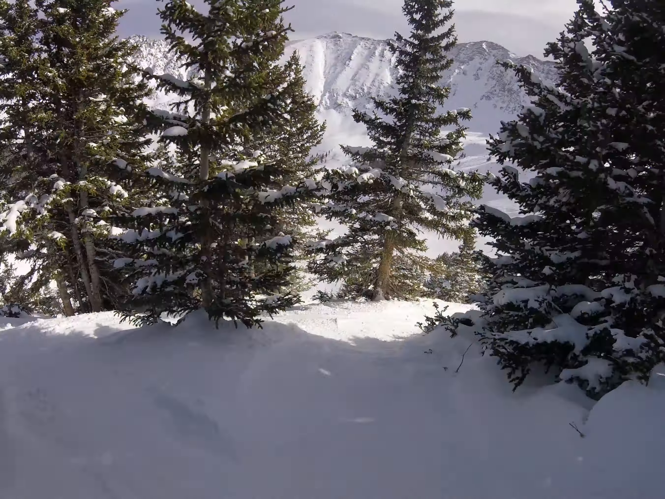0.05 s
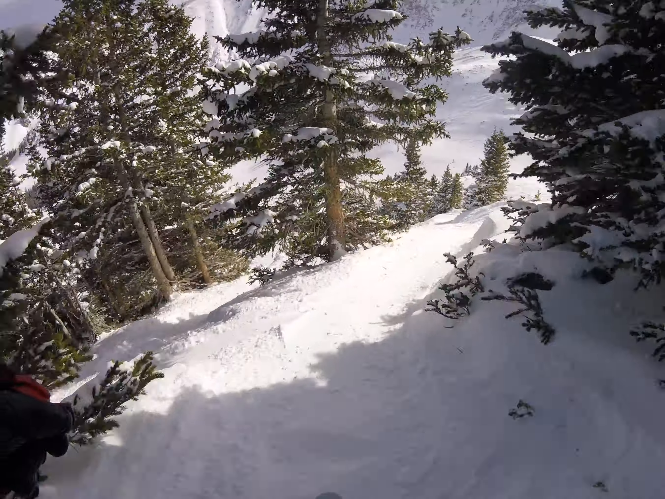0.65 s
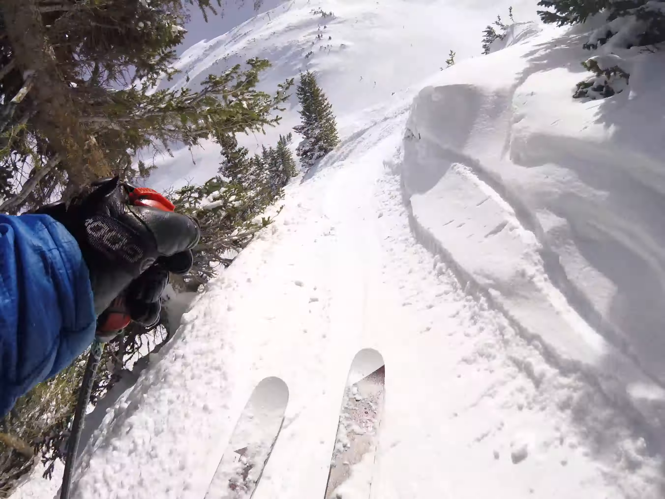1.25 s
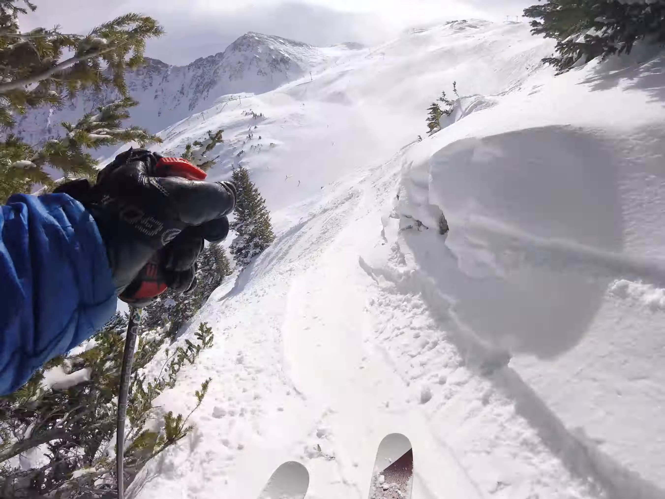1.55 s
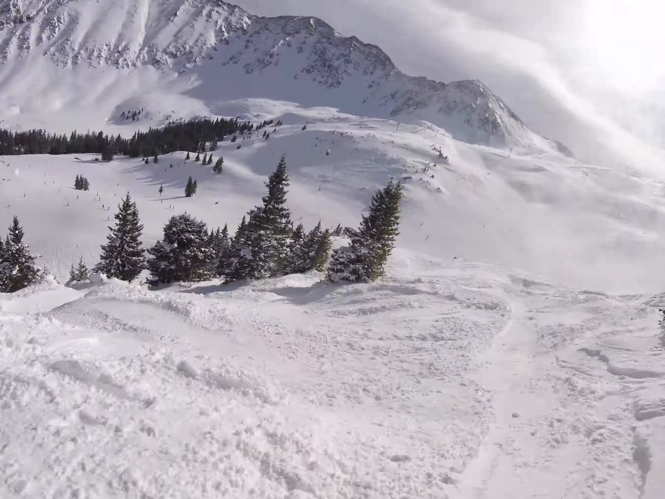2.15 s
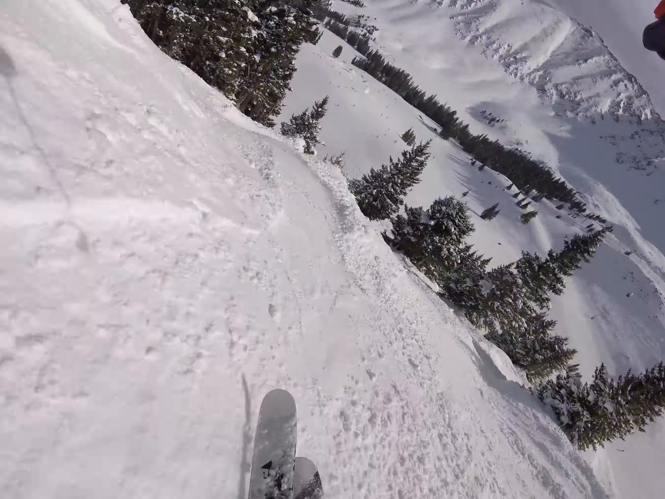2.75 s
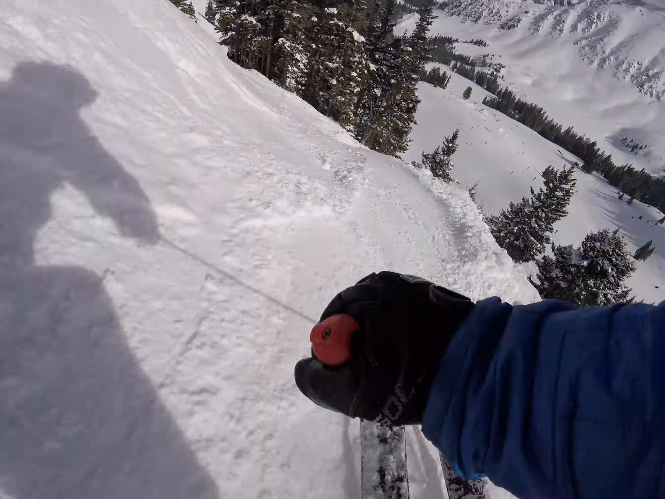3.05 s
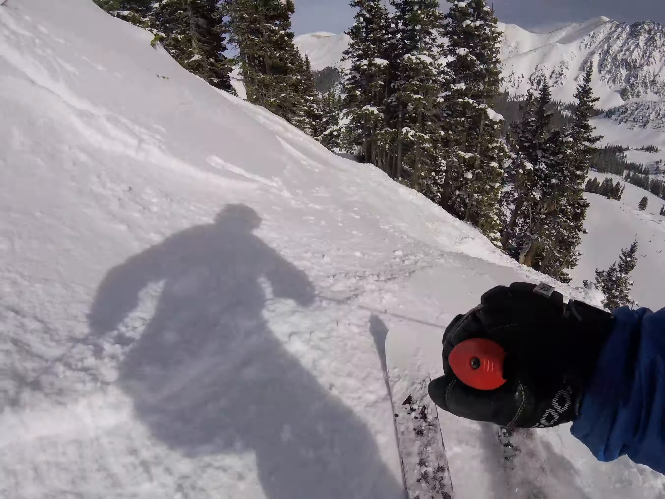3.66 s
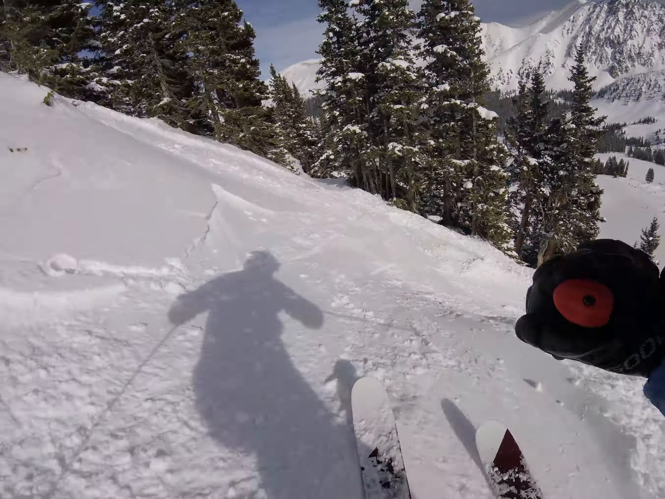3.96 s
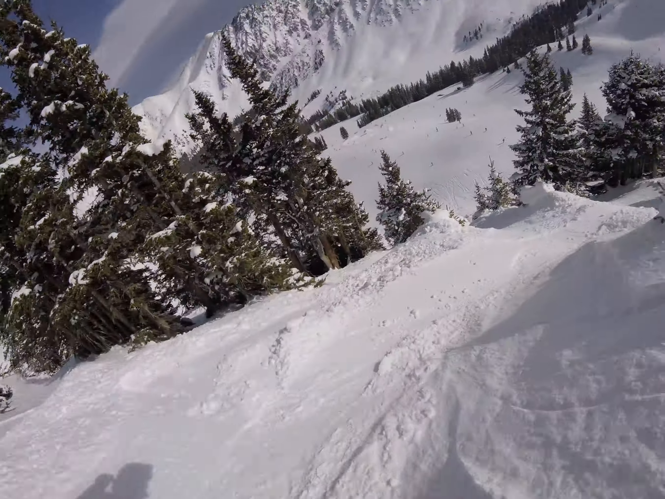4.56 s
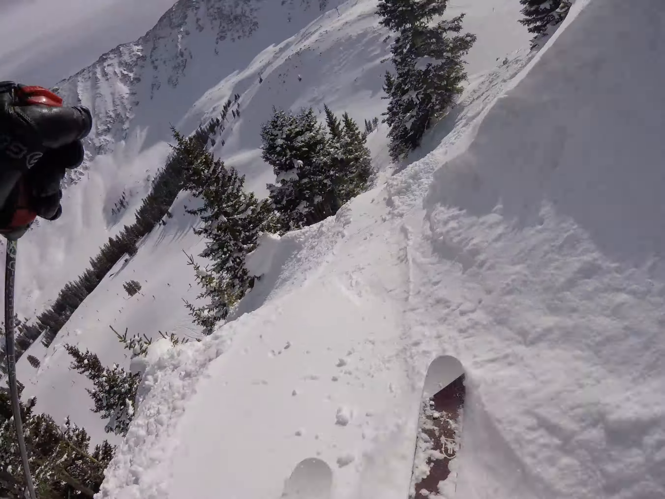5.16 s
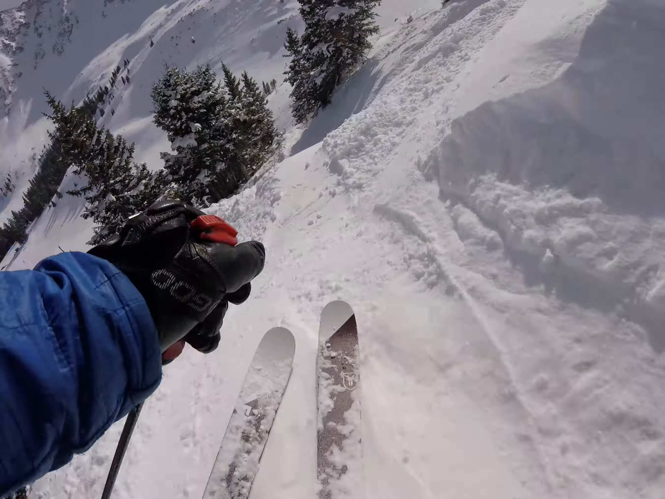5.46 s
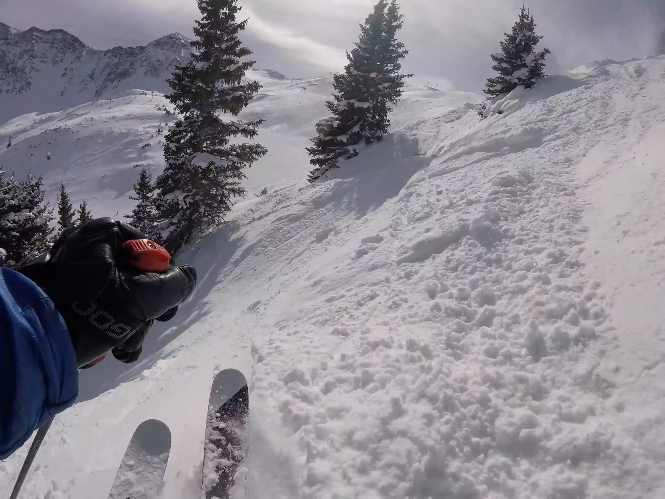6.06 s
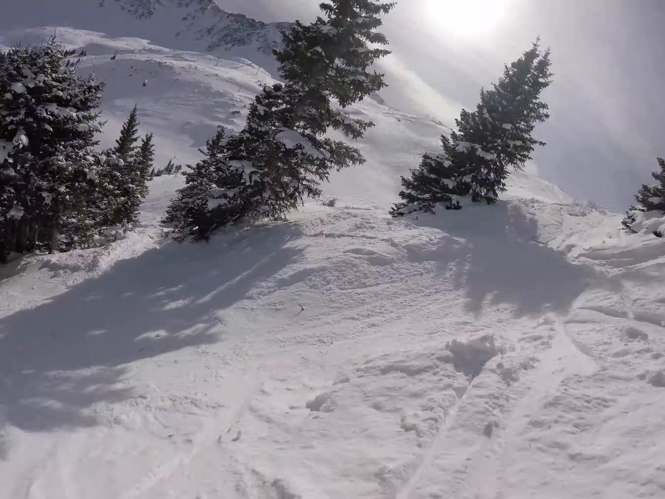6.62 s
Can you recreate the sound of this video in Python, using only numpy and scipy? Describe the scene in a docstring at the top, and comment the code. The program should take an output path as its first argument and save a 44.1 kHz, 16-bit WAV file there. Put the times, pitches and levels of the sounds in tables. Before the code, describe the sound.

Gusty wind rumbles on a body-worn microphone as skis crunch through turns, spray powder and knock over lumps, with brief gear clicks.

```python
"""Powder run through the trees, camera on the body.

Heard from a body's height above the skis: the edges scrape and crunch through each turn and throw
hissing spray, the skis knock over lumps, and a buckle and a pole clack close by. Wind rumbles right on
the microphone and tears at it in gusts; a limiter holds the peaks."""
import sys
import numpy as np
from scipy import signal
from scipy.fft import rfft, irfft
from scipy.io import wavfile
from scipy.ndimage import uniform_filter1d, minimum_filter1d

SR = 44100
rng = np.random.default_rng(int(sys.argv[2]) if len(sys.argv) > 2 else 0)


def master_out(mix):
    """Clip the mix to full scale and print it as 16-bit PCM to the path in sys.argv[1]."""
    frames = np.transpose(np.atleast_2d(mix))
    ceiling = np.clip(frames, -1, 1)
    pcm = np.round(ceiling * 32767).astype(np.int16)
    wavfile.write(sys.argv[1], SR, pcm)


N = 299439
TIME = np.arange(N) / SR

# Snow spray with a clear path to the microphone. Each row, as in every colour: frequency in Hz, gain in dB.
OPEN_SPRAY_COLOUR = [(1200, -3.5), (2600, -4), (3500, -3), (4300, -7.5), (4800, 0), (5300, 3), (5900, -4.5),
                     (6450, -2), (7500, -7.5), (10200, -11), (11000, -18.5), (11700, -27.5), (14000, -27.5),
                     (15200, -46)]
# Eddies shed in step as the air slows. Each row: time in seconds, rate in Hz, relative level in dB.
SHED_EDDIES = [(3.56, 340, -52), (3.63, 294.8, -31.5), (3.72, 188, -28), (3.8, 156.1, -26.5),
               (3.85, 116.4, -22), (3.958, 100, -22), (3.98, 95.13, -51)]


def skis(hard_bite_db=-24, rasp_growth=3.3):
    """Edges crush the snow in small fractures and throw fine spray; both shake as the skis chatter."""
    # The skier's lean. Each row: time in seconds, share of the spray shaded by the body from 0 to 1.
    leaning = [(0, 0.25), (3.25, 0.02), (3.5, 0.83), (4.8, 1), (5.35, 0.84), (5.75, 0.4), (6.4, 0.3),
               (6.79, 0.4)]
    # Crushed snow, firm snow, and spray heard past the body. Each row: frequency in Hz, gain in dB.
    scrape_colour = [(120, 5.5), (350, 10.5), (700, 4.5), (1150, 4), (1500, -0.5), (2100, -6.5),
                     (3000, -14), (4200, -21.5), (6000, -21.5), (12000, -73)]
    rasp_colour = [(450, -14), (800, 16.5), (1150, -18), (1500, -20.5), (2100, 3), (3050, 1.5), (3600, -5),
                   (4400, -14.5), (8000, -39.5)]
    shaded_colour = [(1200, 3.5), (2900, 1), (3700, -11), (4400, -16), (5400, -2), (7100, -1.5),
                     (8000, -9.5), (9300, -16), (11300, -27.5), (12500, -23.5), (15000, -36)]
    chatter = waver(25.6)
    edge_db, powder_db = ski_load()
    fractures = grains(650, 3.4)
    crushed = (rng.standard_normal(N) + fractures) * gain_of(0.5 * chatter)
    scrape = coloured(crushed, scrape_colour) * gain_of(edge_db + 2)
    # an edge that bites hard reaches firm snow and rasps
    rasp_db = hard_bite_db - 4 + rasp_growth * (edge_db - hard_bite_db)
    rasp = coloured(grains(2500, 2.0), rasp_colour) * gain_of(rasp_db)
    crystals = rng.standard_normal(N) + 0.42 * grains(2500, 3.9)
    shade = np.clip(follow(leaning), 0, 1)
    spray = (1 - shade) * coloured(crystals, OPEN_SPRAY_COLOUR) + shade * coloured(crystals, shaded_colour)
    spray = evened(spray * gain_of(chatter)) * gain_of(powder_db + 1)
    return patchy(scrape + (1 - shade) * rasp, depth_db=3) + patchy(spray, depth_db=2)


def ski_load(glide_scrape_db=-55, glide_spray_db=-62, swish_rise_s=0.013, swish_release_s=0.054):
    """Relative levels in dB of edge scrape and powder spray: flat gliding, plus turns, plus swishes."""
    # The skis load up, carve and let go. Each row: time of full load, rise, hold and release in seconds
    # (rise and release per 10 dB, sign ignored), relative scrape and spray in dB.
    turns = [(.18, -1.5, 0.0316, 0.2, -40, -44), (1.3, 1, 0.43, 0.18, -39.5, -42.5),
             (2.75, 0.3453, 0.363, 0.1164, -26.5, -35.5), (3.22, -0.5, 0.0099, 0.1561, -27.5, -36.5),
             (4.97, .5, 0.2904, 0.32, -42.5, -44), (6.02, 0.28, 0.05, 0.1, -37.5, -45),
             (6.45, -0.1, 0.12, -3.5, -39, -43)]
    # An edge catches briefly. Each row: time and hold in seconds, relative scrape and spray in dB.
    catches = [(.07, 0.0133, -37.5, -64), (0.268, .01, -40, -40.5), (0.363, 0.0098, -61, -39.5),
               (0.685, .02, -45, -63), (1.762, 0.081, -33.5, -60), (1.948, 0.007, -41, -43),
               (2.413, 0.039, -31, -46.5), (2.555, 0.022, -26, -37.5), (2.736, 0.024, -27.5, -30.5),
               (2.958, 0.075, -26.5, -32.5), (3.112, 0.0064, -28.5, -43.5), (3.319, 0.0374, -28, -54),
               (3.482, 0.017, -34, -49), (3.7, 0.091, -53.5, -60), (4.045, 0.075, -43.5, -68),
               (4.154, 0.048, -38, -52), (4.247, 0.032, -36.5, -54.5), (4.559, 0.016, -35, -63),
               (4.655, 0.0202, -34.5, -43), (4.886, 0.0326, -29, -31.5), (4.931, 0.0412, -27, -39),
               (5.771, 0.0184, -43.5, -44), (6.39, 0.0156, -54, -51), (6.447, .015, -36, -42),
               (6.582, 0.019, -30, -45)]
    swishes = [(s, swish_rise_s, hold_s, swish_release_s, *levels) for s, hold_s, *levels in catches]
    scrape_power, spray_power = gain_of(glide_scrape_db) ** 2, gain_of(glide_spray_db) ** 2
    for s, rise_s, hold_s, release_s, scrape_db, spray_db in list(turns) + swishes:
        before, after = np.maximum(s - TIME, 0), np.maximum(TIME - s - hold_s, 0)
        load = 10 ** -np.minimum(before / abs(rise_s) + after / abs(release_s), 10)
        scrape_power += load * gain_of(scrape_db) ** 2
        spray_power += load * gain_of(spray_db) ** 2
    return 10 * np.log10(scrape_power), 10 * np.log10(spray_power)


def knocks(rise_s=0.0018):
    """A ski hits a lump: a dull crack and a spit of snow."""
    # Each row: start in seconds, relative level in dB, relative treble in dB, size of the sharp blow
    # within the crunch, pitch factor (low for soft lumps).
    lumps = [(0.0645, -14, -13, 0.47, .95), (.079, -23, -27.5, .2, 0.77), (0.103, -24, -28.5, .8, 0.98),
             (1.768, -18, -20, 0.36, 0.85), (2.771, -17.5, -20, .3, 1.3), (2.7985, -8.5, -10, 1.66, 1.2),
             (2.8504, -15, -13, 0.92, 1.25), (2.911, -21, -15, .7, 0.68), (3.109, -18, -20, .2, 0.72),
             (4.1518, -23.5, -25, 0.59, 0.8), (4.999, -21.5, -14, .2, 1.52), (5.0125, -20, -26, .2, 1.45),
             (5.0228, -22, -17, .2, 1.46), (5.616, -23.5, -32, .2, 0.795), (5.858, -20.5, -20.5, .1, 0.86),
             (5.968, -19, -38, .1, 0.51), (6.093, -15, -34, .1, 0.87), (6.101, -19, -34, .1, 0.773)]
    # The crack at pitch factor 1. Each row: frequency in Hz, gain in dB.
    crack_colour = [(150, -8), (500, 13), (800, 19), (1300, 11.5), (2000, 8.5), (3000, -8), (4500, -19),
                    (9000, -69)]
    out = np.zeros(N)
    for s, db, treble_db, blow, pitch in lumps:
        crack = scuff(transposed(crack_colour, pitch), rise_s, blow)
        spit = gain_of(treble_db - 2) * scuff(OPEN_SPRAY_COLOUR, rise_s)
        add(out, s, gain_of(db + 9) * (crack + spit))
    return out


def wind(strong_db=-20, tear_growth=1.29, orderly_db=-7):
    """Big eddies rumble, smaller ones in the body's wake drum and buffet; the strongest tear raggedly."""
    # Slow pressure swings, the body's wake, and the air's force on the camera, which builds in each turn.
    # Each row: time in seconds, relative level in dB.
    swings = [(0, -23), (.37, -17), (.62, -29.5), (1.05, -21.5), (1.2, -22.5), (1.62, -15), (1.8, -24.5),
              (2.34, -24), (2.42, -14.5), (2.72, -19.5), (3.07, -13.5), (3.42, -28), (3.5, -16),
              (3.62, -18.5), (3.72, -34), (4.15, -35), (4.53, -40.5), (4.66, -28.5), (4.95, -28.5),
              (5.35, -34), (5.65, -20.5), (6.03, -15), (6.44, -23), (6.57, -33.5), (6.72, -25.5)]
    drumming = [(0, -39), (.08, -20), (.36, -25.5), (.5, -43), (1.07, -20), (1.3, -30), (1.42, -15.5),
                (1.68, -25.5), (1.76, -27), (2.25, -33), (2.8, -27.5), (3.1, -16), (3.38, -33.5),
                (3.55, -18.5), (3.94, -19.5), (4.02, -24.5), (4.48, -40.5), (4.7, -28), (5.15, -25),
                (5.27, -30.5), (5.6, -17.5), (6.15, -14.5), (6.4, -24), (6.6, -32.5), (6.76, -38)]
    airflow = [(0, -44), (.09, -23), (.57, -39), (1.06, -23), (1.6, -23), (2.33, -45.5), (2.42, -21),
               (2.6, -26), (2.72, -21), (3.27, -18), (3.38, -47), (3.53, -17.5), (3.68, -35), (4.45, -41.5),
               (4.66, -29.5), (4.98, -25.5), (5.42, -35), (5.76, -20), (6.14, -16), (6.28, -36),
               (6.55, -26), (6.79, -43.5)]
    # Their colours at the microphone. Each row: frequency in Hz, gain in dB.
    rumble_colour = [(5, -5), (20, -1), (45, -3.5), (70, -10.5), (130, -41), (400, -92)]
    wake_colour = [(30, -16.5), (62, 0.5), (100, 1.5), (140, -7), (200, -15.5), (300, -28.5), (800, -80)]
    buffet_colour = [(70, -19), (140, -3.5), (190, 1), (270, -3.5), (380, -8.5), (520, -19.5), (900, -28.5),
                     (2000, -74)]
    force_db = follow(airflow) + 2.28 * waver(2.4)
    rumble = steadied(noise(rumble_colour), 0.0334) * gain_of(follow(swings) + 3 + waver(9.9))
    wake = steadied(noise(wake_colour), 0.065) * gain_of(follow(drumming) + 0.5 + 2.5 * waver(6.7))
    lumpy_air = noise(buffet_colour) * gain_of(3.5 * waver(45))
    buffet = steadied(lumpy_air, 0.0321) * gain_of(force_db - 3)
    tear = tearing() * gain_of(strong_db - 13 + tear_growth * (force_db - strong_db))
    # while eddies are shed in step, the flow is less turbulent
    orderly = uniform_filter1d(between(SHED_EDDIES[1][0], SHED_EDDIES[-1][0]), size=2000)
    return rumble + (wake + buffet + tear) * gain_of(orderly_db * orderly)


def tearing(low_hz=280, high_hz=860, db_per_octave=-7):
    """A hail of eddies in five sizes, the smaller ones higher and weaker."""
    hail = np.zeros(N)
    for hz in np.geomspace(low_hz, high_hz, num=5):
        eddies = signal.oaconvolve(grains(110, 4.0), eddy(hz), "same")
        hail += gain_of(db_per_octave * np.log2(hz / low_hz)) * evened(eddies)
    return steadied(hail, 0.075)


def eddy(hz):
    """The pressure swing of one eddy passing the microphone, of peak 1, centred in 20 ms."""
    phase = 2 * np.pi * hz * (TIME[:SR // 50] - 0.01)
    swing = phase / (1 + phase ** 2 / 14) ** 8
    return swing / abs(swing).max()


def gusts(low_hz=90, top_hz=6000, steepness=3.11, fft_size=8192):
    """Short, ragged bursts of turbulence hit the microphone and stop abruptly."""
    # Each row: start and length in seconds, level in dB, upper edge in Hz.
    bursts = [(0.06, 0.0233, -13, 274), (.668, .04, -23.5, 110), (.775, 0.052, -21.5, 200),
              (1.519, 0.0215, -18.5, 199), (1.579, 0.027, -19, 200), (1.66, 0.044, -16, 200),
              (2.402, 0.042, -23.5, 500), (3.05, 0.068, -17, 794), (3.114, 0.0204, -12, 470),
              (3.239, 0.032, -16, 974), (3.253, 0.032, -13, 128), (3.273, 0.0145, -15, 770),
              (3.435, 0.022, -18, 430), (3.48, 0.046, -20, 402), (4.052, 0.027, -21.5, 115),
              (4.159, 0.027, -17.5, 89), (4.558, 0.048, -25, 572), (4.745, 0.073, -26.5, 118),
              (5.132, 0.069, -24.5, 208), (5.473, 0.0577, -15, 192.4), (5.601, 0.026, -19.5, 502),
              (5.721, 0.027, -16, 234), (5.826, 0.056, -15, 280), (6.068, 0.056, -16, 300),
              (6.25, 0.0492, -21.5, 190), (6.417, 0.026, -18.5, 126)]
    out = np.zeros(N)
    hz = np.fft.rfftfreq(fft_size, 1 / SR)
    flutter = gain_of(2 * waver(75))
    band = hz ** 2 / (hz ** 2 + low_hz ** 2) / np.sqrt(hz + low_hz) * np.exp(-(hz / top_hz) ** 2)
    for s, length_s, db, edge_hz in bursts:
        shape = band / np.sqrt(1 + (hz / edge_hz) ** (2 * steepness - 1))
        n = int(length_s * SR)
        burst = irfft(rfft(rng.standard_normal(fft_size)) * shape)[:n]
        envelope = flutter[int(s * SR):][:n] * signal.windows.tukey(n, .3)
        add(out, s, gain_of(db) * evened(burst * envelope))
    return out


def pops(pitch_factor=0.59, centre_delay_s=0.00276):
    """The largest eddies land on the microphone as separate dull pops and break up with a crackle."""
    # Each row: start in seconds, relative peak in dB, Hz before the pitch factor, relative crackle in dB.
    large_eddies = [(0.0639, -1, 540, -0.5), (0.684, -15, 305, -23), (0.793, -10.5, 294, -16.5),
                    (1.056, -7, 298, -26), (2.91, -10.5, 425, -2.5), (3.244, -8, 302, -5),
                    (3.293, -1, 480, 4), (3.325, -15, 500, -8.5), (3.446, -23, 800, -18),
                    (3.48, -12, 500, -23), (3.546, -9, 546, -3.5), (3.574, -23, 600, -9.5),
                    (3.603, -18, 356, -21), (3.635, -15, 280, -31), (5.638, -17, 400, -10.5),
                    (5.724, -14, 338, -13.5), (5.781, -10.5, 400, -12), (5.813, -11, 360, -8.5),
                    (5.836, -12, 340, -8), (5.858, -4, 394, -12), (5.894, -10.5, 400, -11),
                    (5.905, -12, 450, -6), (5.926, -11, 570, -6), (5.965, -11.5, 567, -8),
                    (5.977, -16, 450, -12.5), (5.995, -17, 400, -12), (6.026, -8.5, 300, -25.5),
                    (6.07, -13, 420, -9), (6.092, -6.5, 500, -14), (6.117, -6, 340, -9),
                    (6.141, -15, 400, -5.5), (6.286, -11.5, 400, -15), (6.322, -13, 363, -25)]
    # An eddy breaking up. Each row: frequency in Hz, gain in dB.
    crackle_colour = [(150, 2.5), (350, -0.5), (550, 3), (850, 2.5), (1250, -12), (2000, -22.5),
                      (3200, -38), (8000, -63)]
    out = np.zeros(N)
    for s, db, hz, crackle_db in large_eddies:
        swing = eddy(hz * pitch_factor)
        add(out, s + centre_delay_s - len(swing) / 2 / SR, gain_of(db - 1.5) * swing)
        add(out, s, gain_of(crackle_db - 1) * scuff(crackle_colour, rise_s=0.0024))
    return out


def shedding(wander=0.11):
    """Eddies shed in step make a hollow, unsteady moan that sinks as the air stream slows."""
    hz = follow(SHED_EDDIES) * (1 + wander * waver(49))
    moan = np.sin(2 * np.pi * np.cumsum(hz) / SR) * gain_of(3.9 * waver(30))
    sounding = between(SHED_EDDIES[0][0], SHED_EDDIES[-1][0])
    return evened(moan) * gain_of(follow(SHED_EDDIES, column=2) - 1) * sounding


def clacks():
    """A buckle near the microphone clicks with a tight metallic ping."""
    # Each row: time in seconds, relative level in dB.
    hits = [(.066, -27), (1.7567, -22), (1.7694, -11.5)]
    # The click of contact. Each row: frequency in Hz, gain in dB.
    click_colour = [(300, -5), (1200, -8), (2800, -7), (4000, -20), (5100, 23.5), (6400, 14), (8000, 10),
                    (10000, 2), (11700, -24), (15000, -22)]
    # Each row: frequency in Hz, relative level in dB, seconds to fall by 60 dB.
    buckle_modes = [(4600, -5, .008), (5300, -1.5, .011), (6350, -11, .011)]
    out = np.zeros(N)
    for s, db in hits:
        add(out, s - .001, gain_of(db - 5.5) * scuff(click_colour, rise_s=0.00081))
        add(out, s, gain_of(db - 1) * ringing(buckle_modes))
    return out


def rattle():
    """A pole chatters against the gear in a few quick contacts and rings briefly."""
    # Each row: start in seconds, relative levels of contact and ring in dB.
    contacts = [(6.228, -21, -40), (6.235, -27, -35.5), (6.238, -18, -25.5), (6.243, -24, -36)]
    # Pole on gear. Each row: frequency in Hz, gain in dB.
    contact_colour = [(400, 4), (1300, 7.5), (2300, 9.5), (3800, -8), (5100, 9.5), (6800, -9), (9500, 4),
                      (11000, -5.5), (12000, -20), (14000, -15), (15500, -35)]
    # Each row: frequency in Hz, relative level in dB, seconds to fall by 60 dB.
    pole_modes = [(802, -11, .07), (1152, 4, 0.11), (1518, -1, 0.05), (1674, -3, .041), (2385, -7, 0.035),
                  (3316, -14, .035)]
    out = np.zeros(N)
    for s, db, ring_db in contacts:
        add(out, s, gain_of(db) * scuff(contact_colour, rise_s=0.0014))
        add(out, s, gain_of(ring_db) * ringing(pole_modes))
    return out


def ticks(rise_s=0.002):
    """Bits of ice strike the skis, each at its own pitch."""
    # Each row: start in seconds, relative level in dB, pitch in Hz, spit of snow in dB against the tick.
    ice_bits = [(.541, -26, 2180, -12), (1.1319, -24, 2400, -3.5), (1.1995, -16.5, 2650, -5),
                (1.8, -23, 1850, -20), (1.967, -20.5, 2720, 0), (4.179, -29, 2600, -3),
                (4.336, -30.5, 2870, -19)]
    # One tick. Each row: multiple of its pitch, gain in dB.
    tick_colour = [(.2, -18), (.55, -4), (.85, 1), (1, 2), (1.25, -4), (1.9, -9), (4.5, -34)]
    out = np.zeros(N)
    for s, db, hz, spit_db in ice_bits:
        tick = scuff(transposed(tick_colour, hz), rise_s)
        spit = gain_of(spit_db) * scuff(OPEN_SPRAY_COLOUR, rise_s)
        add(out, s, gain_of(db - 1.5) * (tick + spit))
    return out


def flurries():
    """Flung powder sprinkles the camera in short, narrow hisses, each at its own pitch."""
    # Each row: thickest moment and length in seconds, level in dB, centre in Hz.
    handfuls = [(2.333, 0.0083, -46, 5800), (2.57, .03, -33, 6740), (2.756, 0.11, -29, 5880),
                (4.249, 0.035, -46, 6560), (4.654, .036, -39, 6420), (4.913, 0.0276, -31.5, 6300)]
    # One hiss. Each row: multiple of its centre frequency, gain in dB.
    hiss_colour = [(.5, -30), (.78, -9.5), (.92, -1), (1, -0.5), (1.1, -3.5), (1.3, -17), (1.65, -26.5),
                   (2, -45)]
    out = np.zeros(N)
    for s, length_s, db, hz in handfuls:
        hiss = noise(transposed(hiss_colour, hz), SR // 5)[:int(length_s * SR)]
        add(out, s - length_s / 2, gain_of(db) * hiss * signal.windows.hann(len(hiss)))
    return out


def singing():
    """Friction stirs a broad resonance of the gliding skis, and they sing hollowly."""
    # One list a spell of singing. Each row: time in seconds, level in dB.
    spells = [
        [(2.08, -59), (2.16, -42.5), (2.22, -69), (2.3, -47), (2.37, -49)],
        [(6.42, -46), (6.5, -34), (6.6, -38.5), (6.7, -45.5), (6.79, -51)],
    ]
    # The skis' resonance. Each row: frequency in Hz, gain in dB.
    resonance = [(500, -42.5), (950, -4.5), (1170, 4), (1330, -8.5), (1600, -2), (2500, -41)]
    envelope = sum(gain_of(follow(spell)) * between(spell[0][0], spell[-1][0]) for spell in spells)
    return noise(resonance) * envelope


def crumbs(level_db=-62):
    """Loose crumbs of snow patter softly against the skis, heard where they run quietly."""
    # Snow on ski. Each row: frequency in Hz, gain in dB.
    crumb_colour = [(500, -12.5), (1500, 7), (2800, 3.5), (4200, -7), (6000, -13), (11000, -40.5)]
    return coloured(grains(350, 2.5), crumb_colour) * gain_of(level_db)


def grains(per_s, spread_db):
    """Random tiny impulses, a few much larger than the rest, at rms 1."""
    size = gain_of(spread_db * np.minimum(rng.exponential(1, N), 4))
    return evened(size * rng.choice([-1, 1], N) * (rng.random(N) < per_s / SR))


def scuff(colour, rise_s, blow=0):
    """Tiny contacts swell and die within milliseconds, at fixed energy; a blow may land at their height."""
    age = TIME[:2048] / rise_s
    swelling = age ** 2 * np.exp(-2 * age)
    contacts = rng.standard_normal(len(age)) * swelling + blow * (swelling == swelling.max())
    return coloured(np.roll(contacts, 16), colour) / 14


def ringing(modes):
    """Dying sines, one a mode."""
    t = TIME[:SR // 5]
    return sum(gain_of(db - 60 * t / t60) * np.sin(2 * np.pi * hz * t) for hz, db, t60 in modes)


def patchy(x, depth_db):
    """Each clump of snow sounds at its own pitch: small swells scattered over time and frequency."""
    spectra = signal.stft(x, nperseg=512, noverlap=384)[2]
    field = rng.standard_normal(spectra.shape)
    for _ in range(2):
        field = uniform_filter1d(uniform_filter1d(field, size=4, axis=0), size=6, axis=1)
    clumps = evened(gain_of(depth_db * evened(field)))
    return signal.istft(spectra * clumps, nperseg=512, noverlap=384)[1][:N]


def coloured(x, colour):
    """Gives x a spectrum, at rms 1."""
    hz, db = np.transpose(colour)
    bins = np.fft.rfftfreq(len(x), 1 / SR)
    shape = gain_of(np.interp(np.log(bins + 1), np.log(hz), db))
    return evened(irfft(rfft(x) * shape, len(x)))


def noise(colour, n=N):
    """Noise of a given spectrum, at rms 1."""
    return coloured(rng.standard_normal(n), colour)


def transposed(colour, factor):
    """A spectrum moved up or down in frequency."""
    return [(hz * factor, db) for hz, db in colour]


def waver(rate_hz):
    """A smooth random wobble of rms 1, up to about a rate."""
    ratio = np.fft.rfftfreq(N, 1 / SR) / rate_hz
    return evened(irfft(rfft(rng.standard_normal(N)) * ratio / (1 + ratio ** 2) ** 2, N))


def steadied(x, seconds):
    """Evens out the swells of a noise that are slower than the given time."""
    size = max(int(seconds * SR), 2)
    power = uniform_filter1d(uniform_filter1d(x ** 2, size), size)
    return x / np.sqrt(abs(power) + 1e-9)


def dips(spans):
    """Gain that drops briefly in each of the given spans."""
    drop_db = sum(db * between(start, end) for start, end, db in spans)
    return gain_of(uniform_filter1d(drop_db, size=300))


def between(start_s, end_s):
    """1 between two times, 0 elsewhere."""
    return 1.0 * ((TIME > start_s) & (TIME < end_s))


def follow(rows, column=1):
    """One column of a curve at every sample."""
    rows = np.asarray(rows, float)
    return np.interp(TIME, rows[:, 0], rows[:, column])


def gain_of(db):
    """Decibels to a factor."""
    return 10 ** (np.asarray(db) / 20)


def evened(x):
    """Scales to rms 1."""
    return x / np.sqrt(np.mean(x ** 2) + 1e-20)


def add(mix, s, sound):
    """Mixes a sound in at a time in seconds."""
    part = mix[max(round(s * SR), 0):][:len(sound)]
    part += sound[:len(part)]


def scene():
    """Snow and gear under the wind, on one body-worn microphone."""
    # Brief dips in the wind and snow sound; near 3.1 s the limiter ducks both.
    # Each row: start and end in seconds, gain in dB.
    wind_dips = [(.47, .53, -3.5), (.585, .66, -3), (1.716, 1.763, -6), (2.16, 2.23, -2.5),
                 (2.58, 2.615, -6), (3.14, 3.22, -11.5), (3.968, 4.047, -11), (4.615, 4.655, -2.5),
                 (4.835, 4.87, -8), (5.537, 5.597, -4.5), (5.793, 5.81, -5.5), (5.868, 5.89, -2),
                 (6.004, 6.05, -4), (6.195, 6.225, -3.5), (6.62, 6.66, -6)]
    snow_dips = [(.5, .66, -1.5), (2.2, 2.335, -9.5), (2.335, 2.378, -4.5), (2.475, 2.558, -4),
                 (2.778, 2.797, -4), (3.07, 3.105, -3.5), (3.129, 3.153, -13.5), (3.153, 3.2, -4.5),
                 (3.3, 3.47, -5), (4.61, 4.64, -0.5), (6.004, 6.055, -1)]
    air = wind() * dips(wind_dips) + gusts() + pops() + shedding()
    snow = skis() * dips(snow_dips) + flurries() + crumbs() + singing() + knocks() + ticks()
    gear = clacks() + rattle()
    return (air + snow + gear)[None]


def record(dry, ceiling=0.94, cutoff_hz=15050):
    """The camera's fast limiter ducks everything under the largest peaks; a low-pass cuts the top."""
    headroom = np.minimum(1, ceiling / (abs(dry[0]) + 1e-9))
    gain = uniform_filter1d(minimum_filter1d(headroom, size=301), size=301)
    lowpass = signal.firwin(511, cutoff_hz, window=("kaiser", 9), fs=SR)
    return signal.oaconvolve(dry * gain, lowpass[None], "same")


dry = scene()
out = record(dry)
master_out(out)
```